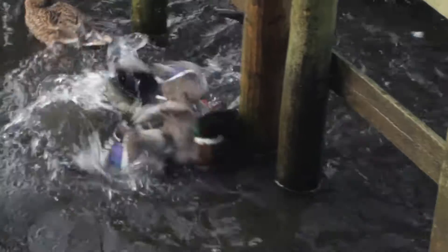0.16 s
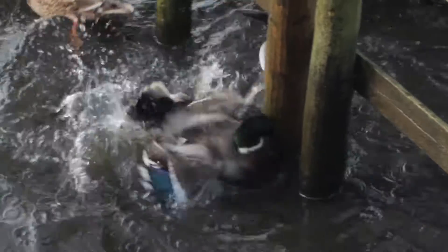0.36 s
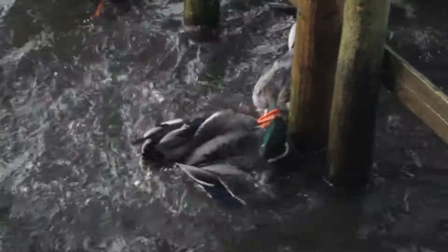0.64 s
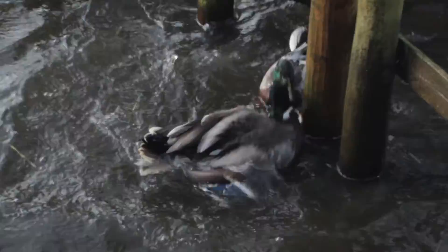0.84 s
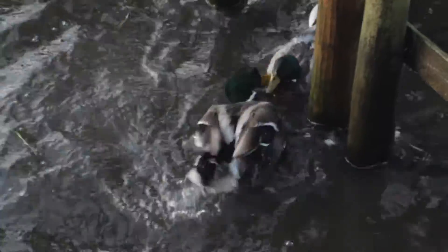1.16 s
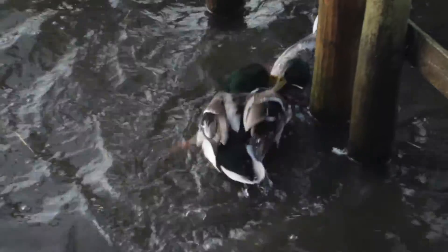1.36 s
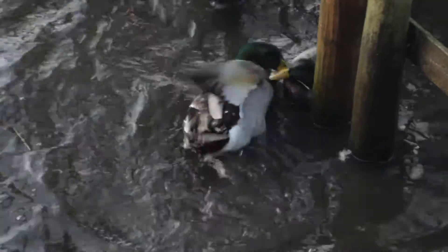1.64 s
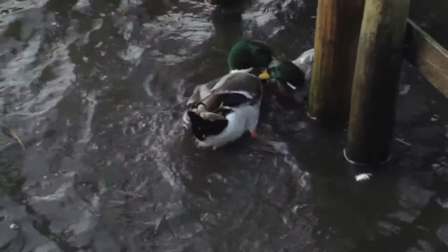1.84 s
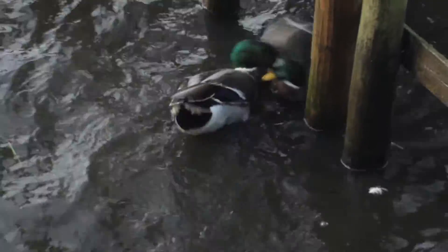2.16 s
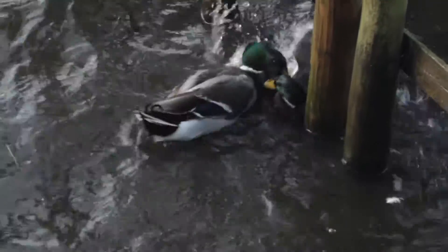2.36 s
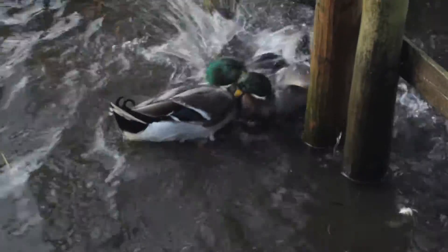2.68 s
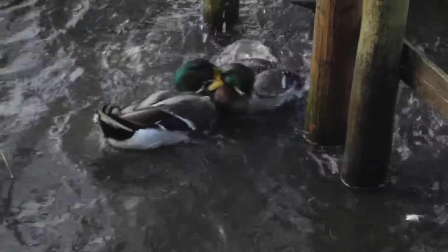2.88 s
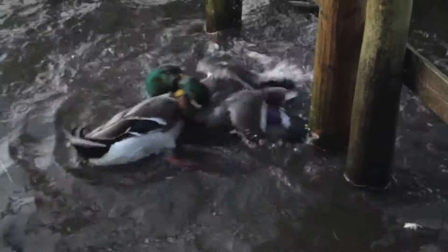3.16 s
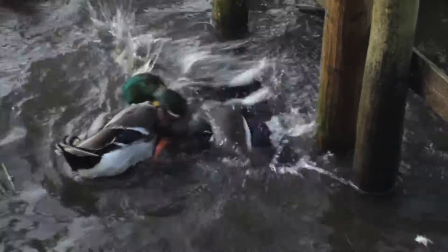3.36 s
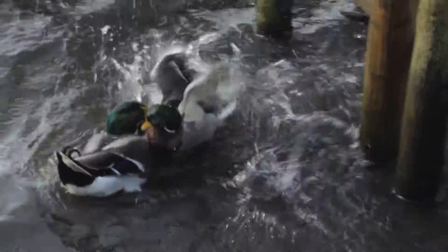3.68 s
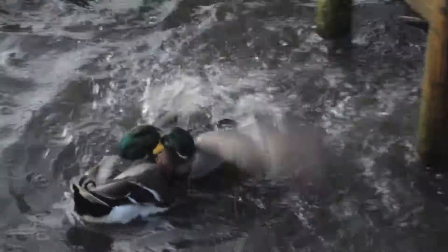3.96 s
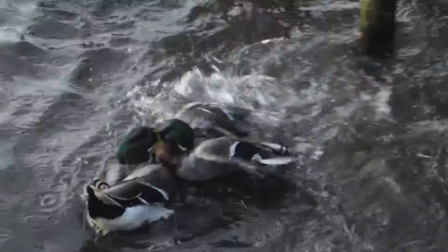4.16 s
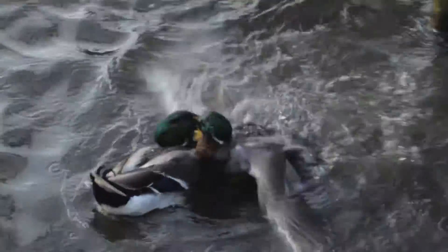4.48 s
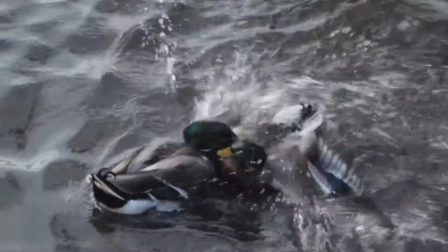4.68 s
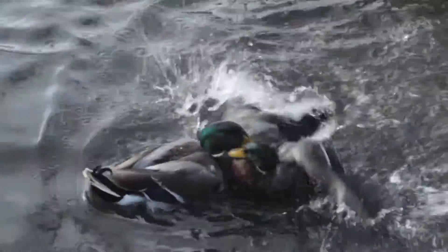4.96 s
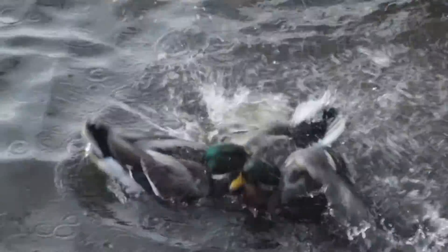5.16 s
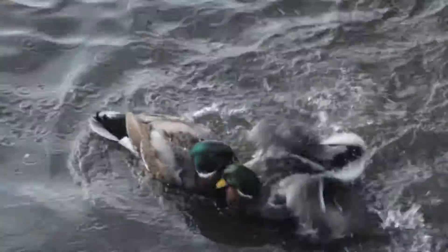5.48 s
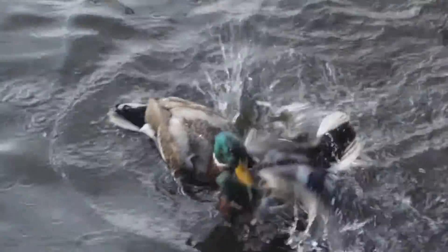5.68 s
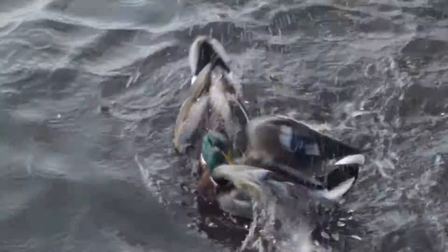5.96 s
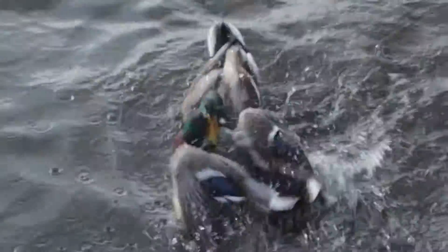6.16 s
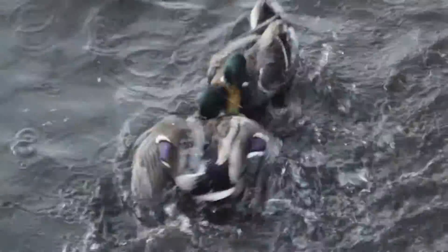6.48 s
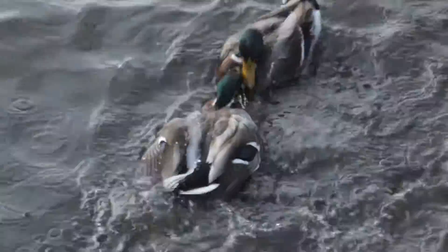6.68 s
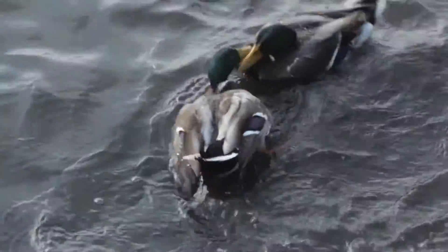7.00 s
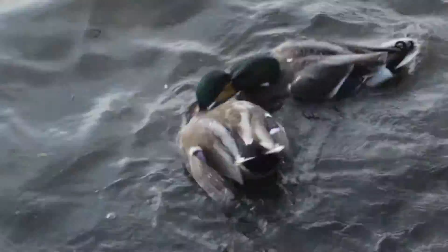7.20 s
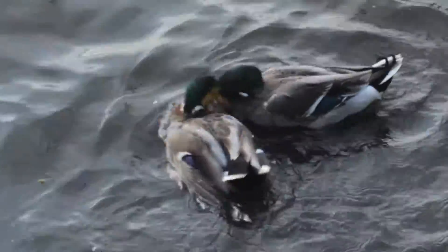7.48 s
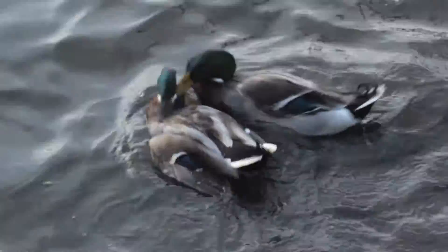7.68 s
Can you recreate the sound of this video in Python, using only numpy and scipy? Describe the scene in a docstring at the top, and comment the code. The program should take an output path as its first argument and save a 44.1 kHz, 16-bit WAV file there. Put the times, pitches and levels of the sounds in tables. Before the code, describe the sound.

Outdoors by a wooden pier, two ducks fight in water. A half-second flurry of wet wing slaps opens, then the water calms to small plops and trickles. After two seconds slaps return in bursts, hardest around five to six seconds, with bright spray and churning. A vehicle passes behind, its rumble, rush and tyre hum peaking after six and a half seconds, then everything fades. Small stereo recorder, close to the splashes, faint hiss.

```python
"""Two ducks fight in shallow water beside a wooden pier. A first short flurry of wing slaps, each a pop with
spray, gives way to churning water and plops, made of random drops and short gliding tones.
After two seconds the slaps return in bursts; a passing vehicle then swells up as rumble, rush and tyre hum,
all filtered noise, peaks after six seconds and sinks again as the churning fades out.
Low thumps, channel hiss and a faint high whistle go with it, on a small stereo recorder."""
import sys
import numpy as np
from scipy import signal
from scipy.fft import next_fast_len
from scipy.io import wavfile

SR = 44100
rng = np.random.default_rng(int(sys.argv[2]) if len(sys.argv) > 2 else 0)


def transcribe(signal):
    """Save signal, clipped to [-1, 1], as a 16-bit WAV file at the path in sys.argv[1]."""
    frames = np.atleast_2d(signal).T
    limited = np.clip(frames, -1, 1)
    pcm = np.round(limited * 32767).astype(np.int16)
    wavfile.write(sys.argv[1], SR, pcm)


N = 345514   # length in samples

# All levels are mixing levels: the filters, flicker and channel gains further on still change them.
# Wing slaps: start_s, smack_level_db, body_pitch_hz, spray_level_db, mist_db (at 8 kHz and up, re spray)
WING_SLAPS = [(0.118, -47, 3980, -47, 1), (0.1858, -35, 2670, -44.5, -2), (0.254, -42, 1550, -63, -15),
              (0.414, -60, 450, -45, -7), (0.455, -54, 493, -44.5, -18), (2.3195, -39, 2670, -38, -0.5),
              (2.531, -47, 1840, -49.5, -10), (2.5396, -36.5, 1740, -44, -6),
              (2.738, -46, 1510, -53.5, -19), (2.7459, -29.5, 2120, -42.5, 1.5),
              (3.1953, -43, 1860, -48, -5), (3.227, -60, 4000, -66, 12), (3.397, -44, 2650, -45.5, -7),
              (3.426, -40, 2670, -44.5, -2), (3.515, -67.5, 1100, -52, -6), (3.641, -60, 2490, -46, -11),
              (3.656, -40.3, 1110, -44.5, 2), (3.8682, -38.5, 2150, -41.5, 0),
              (4.112, -55, 2090, -53.5, -8), (4.602, -36, 2710, -37.5, -5),
              (4.797, -41, 1440, -40.5, -12.5), (4.978, -60, 4000, -47.5, -1),
              (4.9926, -24.5, 1363, -35.5, -19), (5.006, -26, 1540, -56, 7), (5.023, -48, 1500, -71, -27),
              (5.194, -39, 1500, -45.5, -4), (5.201, -35, 2350, -39.5, -6), (5.213, -37.5, 1940, -83, -8),
              (5.3642, -51, 1490, -45.5, -20), (5.458, -70, 2000, -52.5, -4), (5.702, -31, 2520, -34, -5),
              (5.722, -21.5, 4420, -42.5, -6), (5.9175, -41, 1430, -37.5, -8),
              (6.132, -60, 5970, -47.5, -2.5), (6.15, -40, 2630, -35.5, -6.5),
              (6.364, -63, 2000, -42, -5.5), (6.404, -58, 1500, -44, -4.5), (6.89, -55, 1500, -55, -13)]
# Tone colour of the spray: frequency_hz, density_db (per Hz)
SPRAY_COLOUR = [(70, 10.5), (250, 1), (700, 1.5), (2000, -5), (4200, -2.5), (5250, -2.5), (6600, -10.5),
                (12500, -11), (13800, -26)]
# Air pockets closing under water: start_s, level_db, first_pitch_hz, last_pitch_hz, length_s
AIR_PLOPS = [(0.091, -59, 1080, 1260, 0.0092), (0.242, -55, 384, 385, 0.028),
             (0.569, -66, 1160, 1230, 0.023), (0.655, -64, 660, 790, 0.026),
             (0.713, -65, 1580, 1450, 0.024), (1.168, -65, 2370, 2420, 0.0095),
             (1.358, -68, 1360, 1430, 0.016), (2.674, -54.5, 2070, 2300, 0.0072),
             (3.021, -63.5, 743, 866, 0.036), (3.363, -60, 1020, 1420, 0.011),
             (3.52, -49.5, 630, 1580, 0.027), (4.176, -65, 1950, 2030, 0.012),
             (4.321, -64.5, 1500, 1520, 0.018), (5.357, -53, 410, 520, 0.029),
             (5.597, -57, 540, 480, 0.034), (5.771, -55, 1450, 1550, 0.024),
             (6.568, -51, 1610, 1500, 0.011)]
# How strongly the water is stirred: time_s, level_db
CHURN_CURVE = [(0.0, -64), (0.37, -66), (0.8, -76.5), (2.3, -80.5), (2.42, -73.5), (2.7, -67),
               (2.85, -72.5), (3.27, -73), (3.58, -67.5), (3.92, -63.5), (3.99, -69.5), (4.05, -64),
               (4.16, -70.5), (4.34, -68), (4.45, -80.5), (4.6, -73), (4.82, -65.5), (5.06, -65),
               (5.69, -70), (5.89, -64), (7.04, -64), (7.24, -67), (7.44, -76.5), (7.83, -100)]
# Tone colour of the stirred water: frequency_hz, relative_density_db (per Hz)
WATER_COLOUR = [(150, 1), (400, 3), (800, 9), (2000, 5), (4200, 3), (5250, -6.5), (6600, -17), (13500, -19)]
# Tone colour of the low rumble: frequency_hz, relative_density_db (per Hz)
RUMBLE_COLOUR = [(40, -5), (90, 10.5), (150, 4), (250, -6), (400, -30.5)]
# Tone colour of the broad rush: frequency_hz, relative_density_db (per Hz)
RUSH_COLOUR = [(150, 1), (300, 1.5), (560, -4), (750, -14), (1050, -18.5), (1300, -25.5), (5250, -37.5),
               (6600, -81), (12000, -73)]
# Single low thumps: start_s, level_db
LOW_THUMPS = [(0.168, -37.5), (0.412, -33), (0.454, -40), (2.318, -34), (4.848, -36.5), (5.008, -34.5),
              (5.486, -40), (5.535, -29.5), (5.818, -27.5), (5.865, -32.5), (6.102, -27.5), (6.888, -27),
              (7.349, -31.5), (7.638, -34.5)]
# A vehicle passes: time_s, rumble_level_db, rush_level_db, tyre_hum_level_db
# Before the first row the levels stay as in that row.
PASSING_CURVE = [(4.2, -70, -90, -90), (4.55, -62, -69.5, -76), (5.17, -53.5, -65.5, -71.5),
                 (5.7, -48.5, -60, -63), (5.95, -44.5, -55, -58.5), (6.24, -41.5, -51.5, -55),
                 (6.6, -41, -42, -46.5), (6.85, -42, -43, -55), (7.06, -45.5, -47.5, -56),
                 (7.22, -47.5, -50, -66), (7.5, -55.5, -60, -75), (7.83, -63, -60.5, -72)]
# Short swells of the deep noise: centre_s, level_db
DEEP_SWELLS = [(0.5, -57), (2.69, -48.5), (3.5, -64)]
# Tone colour of the channel hiss: frequency_hz, relative_density_db (per Hz)
HISS_COLOUR = [(200, 4), (600, 2), (1500, -3.5), (4000, -6.5), (6500, -8.5), (15700, -11)]

SPRAY_T60_S = 0.24   # time for spray at 3 kHz to fall 60 dB
SPRAY_LEAD_S = 0.0021   # spray bursts this long before the slap's time
BODY_DB, BODY_OCTAVES = 4.5, 1   # swell of the spray around the body pitch: height, half width
SWISH_DB, SWISH_T60_S = -21, 0.06   # wing tip before the burst: level re spray, time to rise 60 dB
SMACK_TOP_HZ, SMACK_CYCLES = 6000, 5.7   # treble limit; cycles to fall 60 dB
FROTH_DB, FROTH_S = -11, 0.08   # bubbles after a slap: first level re spray, time span
GURGLE_DB, GURGLE_S = -18, 0.05   # bubbles after a plop: change of level over the time span
GURGLE_OCTAVES = 0.25   # pitch spread of those bubbles, up or down
WIDE_TREBLE_HZ = 2430   # the treble that differs between the channels lies mostly above this
SHARED_TREBLE_HZ, SHARED_TREBLE_DB = 6820, 7.5   # treble alike in both channels: lowest frequency, gain
DEEP_DB, DEEP_FOLLOWS = -65.5, 0.18   # deep noise at first; share of the rumble's rise in dB
SWELL_S = 0.063   # time from the middle of a deep swell to 1/e of its height
LUMPS_DB, LUMPS_HZ = 1.2, 22   # lumps in the passing vehicle's level: depth, speed
TYRE_HZ, TYRE_WIDTH_HZ = 955, 266   # tyre hum: centre and width of its band
TURN_HZ, RIGHT_SHARE = 133, 0.47   # where polarity turns over; right level as a share of the left
HISS_DB, TOP_HISS_DB = -69.5, -72.5
WHISTLE_HZ, WHISTLE_DB = 15734, -87.5
CUTOFF_HZ = 16000


def slap_spray():
    """The wing tip swishes in, water bursts up, then the spray dies away, treble first."""
    before_s = 0.03
    t = np.arange(-before_s, 0.4, 1 / SR)
    swish = from_db(SWISH_DB + 60 * t / SWISH_T60_S)
    out = np.zeros(N)
    for hz, drops in bands(droplets(26000, spread_db=0.5), 70, 14000):
        level = np.zeros(N)
        splash = from_db(-60 * t / (0.00037 + 10 / hz))
        spray_t60_s = SPRAY_T60_S * (hz / 3000) ** -0.2
        spray = from_db(-3.5 - 60 * t / spray_t60_s)
        burst = np.where(t < 0, swish, splash + spray)
        for s, _, body_hz, spray_db, mist_db in WING_SLAPS:
            body_db = BODY_DB * np.exp(-(np.log2(hz / body_hz) / BODY_OCTAVES) ** 2)
            mist = at_hz([(3000, 0), (8000, mist_db)], hz)
            add(level, s - SPRAY_LEAD_S - before_s, from_db(spray_db + body_db + mist) * burst)
        flicker_db = 0.92 * drift(44.0)
        out += level * drops * from_db(at_hz(SPRAY_COLOUR, hz) + flicker_db)
    return out * from_db(-2.0)


def slap_smacks():
    """Air caught under the wing is squeezed out: a pop that rings for a cycle or two."""
    out, t = np.zeros(N), np.arange(SR // 100) / SR
    signs = rng.choice([-1, 1], len(WING_SLAPS))
    for (s, level_db, hz, *_), sign in zip(WING_SLAPS, signs):
        fade = from_db(level_db - 60 * t * hz / SMACK_CYCLES)
        pop = sign * fade * np.sin(2 * np.pi * hz * t)
        add(out, s - 0.25 / hz, pop)   # the first crest falls on the slap's time
    return signal.sosfilt(signal.butter(4, SMACK_TOP_HZ, "low", fs=SR, output="sos"), out)


def slap_froth():
    """Each slap drags a dozen bubbles under, at pitches around and below its body, later ones fainter."""
    out = np.zeros(N)
    for (s, _, body_hz, spray_db, _), chance in zip(WING_SLAPS, rng.random((len(WING_SLAPS), 12, 2))):
        for late, pitch in chance:
            hz = min(body_hz, 2000) * 2 ** (0.5 - 2 * pitch)
            level = from_db(spray_db + FROTH_DB * (1 + late))
            add(out, s + FROTH_S * late ** 2, level * plop(hz, hz * 1.15, 8 / hz))
    return out


def stirred_water(churn_db):
    """Many drops make a wash, small random bubbles ring in it, and larger air pockets plop."""
    wash = coloured(droplets(5000, spread_db=0.0), WATER_COLOUR, together_db=1.5, patchy_db=2.5, rate_hz=18.5)
    small = small_bubbles()
    return from_db(churn_db) * (wash + from_db(-10.0) * small) + air_plops()


def small_bubbles():
    """Short rising tones at random times, pitches and levels; rms 1."""
    out = np.zeros(N)
    for when, pitch, size in rng.random((900, 3)):
        hz = 450 * 6 ** pitch
        add(out, when * N / SR, from_db(22 * size) * plop(hz, hz * 1.09, 12 / hz))
    return rms_one(out)


def air_plops():
    """Each closing air pocket is a gliding tone, joined by six bubbles that weaken the later they come."""
    out = np.zeros(N)
    for (s, level_db, *glide), chance in zip(AIR_PLOPS, rng.random((len(AIR_PLOPS), 6, 2))):
        _, last_hz, length_s = glide
        add(out, s, from_db(level_db) * plop(*glide))
        for late, pitch in chance:
            hz = last_hz * 2 ** (GURGLE_OCTAVES * (2 * pitch - 1))
            level = from_db(level_db + GURGLE_DB * (-0.5 + late))
            add(out, s + length_s / 2 + GURGLE_S * late, level * plop(hz, hz * 0.99, 10 / hz))
    return out * from_db(3 * drift(300))   # the pockets wobble as they close


def plop(first_hz, last_hz, length_s):
    """A bubble swells and dies as a sine that glides while its depth changes."""
    share = np.linspace(0, 1, int(length_s * SR) + 2)
    turns = length_s * share * (first_hz + (last_hz - first_hz) * share / 2)
    return np.sin(2 * np.pi * turns) * np.sin(np.pi * share ** 0.88) ** 2


def droplets(per_s, spread_db):
    """Two rows of random drop impacts, uneven in size if spread_db is above 0; rms 1."""
    size_db = spread_db * np.minimum(rng.exponential(1, (2, N)), 5)
    sizes = from_db(size_db) * rng.choice([-1, 1], (2, N))
    hits = rng.random((2, N)) < per_s / SR
    return rms_one(sizes * hits + 1e-9)


def wide_treble(x):
    """A treble copy, half a millisecond late, its phase wandering differently in each channel."""
    late = np.pad(x, (SR // 2000, 0))[:N]
    treble = signal.sosfilt(signal.butter(1, WIDE_TREBLE_HZ, "high", fs=SR, output="sos"), late)
    return scattered(treble, 2) * from_db([[-1.0], [1.5]])


def shared_treble(x):
    """A high band of the splashing with wandering phase, the same in both channels."""
    edges_hz = [SHARED_TREBLE_HZ, 1.68 * SHARED_TREBLE_HZ]
    band = signal.butter(2, edges_hz, "band", fs=SR, output="sos")
    return scattered(signal.sosfilt(band, x), 1)


def passing_vehicle(rumble_db, rush_db, lumps):
    """A vehicle goes by: deep noise, lumpy rumble and rush, with single low thumps."""
    deep = from_db(deep_level(rumble_db)) * band_pass(rng.standard_normal(N), 21.6, 56)
    rumble = coloured(rng.standard_normal((2, N)), RUMBLE_COLOUR, together_db=3.5, patchy_db=0.85, rate_hz=35)
    rush = coloured(rng.standard_normal((2, N)), RUSH_COLOUR, together_db=1.5, patchy_db=0.86, rate_hz=26)
    passing = lumps * (from_db(rumble_db) * rumble + from_db(rush_db) * rush)
    return deep + passing + low_thumps()


def deep_level(rumble_db):
    """The deep noise follows part of the rumble's rise and has a few short swells; in dB."""
    t = np.arange(N) / SR
    steady = from_db(DEEP_DB + DEEP_FOLLOWS * (rumble_db - rumble_db[0]))
    swells = sum(from_db(level_db) * np.exp(-((t - s) / SWELL_S) ** 2) for s, level_db in DEEP_SWELLS)
    return 20 * np.log10(steady + swells)


def low_thumps():
    """Each thump is a low tone that starts fast and fades within hundredths of a second."""
    out, t = np.zeros(N), np.arange(SR // 10) / SR
    rise = np.minimum(t / 0.0022, 1)
    for s, level_db in LOW_THUMPS:
        fade = from_db(level_db - 60 * t / 0.03)
        add(out, s, fade * np.sin(2 * np.pi * 150 * t) * rise)
    return out


def tyre_hum(hum_db, lumps):
    """Tyres on the road: a narrow band of noise near 1 kHz, weaker on the right."""
    low_hz, high_hz = TYRE_HZ - TYRE_WIDTH_HZ / 2, TYRE_HZ + TYRE_WIDTH_HZ / 2
    hum = band_pass(rng.standard_normal(N), low_hz, high_hz)
    return lumps * from_db(hum_db) * hum * [[1], [RIGHT_SHARE]]


def electronics():
    """Circuit noise: hiss of each channel, a shared band of hiss at the very top and a steady whistle."""
    hiss = [coloured(rng.standard_normal((2, N)), HISS_COLOUR, together_db=0, patchy_db=0.3, rate_hz=10)
            for side in range(2)]
    top = signal.sosfilt(signal.butter(6, 15000, "high", fs=SR, output="sos"), rng.standard_normal(N))
    whistle = np.sin(2 * np.pi * WHISTLE_HZ * np.arange(N) / SR)
    return from_db(HISS_DB) * np.array(hiss) + from_db(TOP_HISS_DB) * top + from_db(WHISTLE_DB) * whistle


def two_channels(x, apart):
    """The right is weaker and turns over in polarity above the bass; both gain treble; "apart" is added."""
    w = 2 * np.pi * TURN_HZ
    shared = [1 - RIGHT_SHARE, (1 + RIGHT_SHARE) * w]
    left = signal.lfilter(*signal.bilinear([2, 2 * w], shared, SR), x)
    right = signal.lfilter(*signal.bilinear([-2 * RIGHT_SHARE, 2 * RIGHT_SHARE * w], shared, SR), x)
    return np.array([left, right]) + apart


def coloured(source, spectrum, together_db, patchy_db, rate_hz):
    """Noise with a spectrum; the bands flicker partly together, partly alone; rms 1."""
    shared_db = together_db * drift(rate_hz)
    out = np.zeros(N)
    for hz, x in bands(source, spectrum[0][0], spectrum[-1][0]):
        out += x * from_db(at_hz(spectrum, hz) + shared_db + patchy_db * drift(rate_hz))
    return rms_one(out)


def bands(source, low_hz, high_hz):
    """Third-octave bands (centre, signal), neighbours fed from different rows of the source."""
    edges = 23 * 2 ** (np.arange(31) / 3)
    edges = edges[(edges > low_hz / 1.2) & (edges < high_hz * 1.2)]
    for k, (low, high) in enumerate(zip(edges, edges[1:])):
        sos = signal.butter(2, [low, high], "band", fs=SR, output="sos")
        yield np.sqrt(low * high), signal.sosfilt(sos, source[k % len(source)])


def scattered(x, count):
    """Copies of a sound whose phase wanders, each in its own way."""
    whole = signal.hilbert(x, next_fast_len(N))[:N]
    return np.array([np.real(whole * np.exp(3j * drift(40))) for k in range(count)])


def drift(rate_hz):
    """Slow random wandering with spread 1: smoothed noise, worked out at every 40th sample."""
    r = np.exp(-80 * np.pi * rate_hz / SR)
    noise = rng.standard_normal(N // 40 + 2002)
    slow = signal.lfilter([1], [1, -2 * r, r * r], noise)[2000:]   # skip the filter's start
    return np.interp(np.arange(N) / 40, np.arange(len(slow)), rms_one(slow))


def band_pass(x, low_hz, high_hz):
    """One steep band, rms 1."""
    return rms_one(signal.sosfilt(signal.butter(3, [low_hz, high_hz], "band", fs=SR, output="sos"), x))


def in_time(rows):
    """Columns of a curve table, one value a sample."""
    s, *columns = np.transpose(rows)
    return [np.interp(np.arange(N) / SR, s, c) for c in columns]


def at_hz(points, hz):
    """Read a spectrum on a log-frequency axis."""
    points = np.array(points)
    return np.interp(np.log(hz), np.log(points[:, 0]), points[:, 1])


def from_db(db):
    """Decibels to gain."""
    return 10 ** (np.asarray(db) / 20)


def rms_one(x):
    """Scale to unit rms."""
    return x / np.sqrt(np.mean(x ** 2) + 1e-20)


def add(out, s, sound):
    """Mix a sound in at a time in seconds."""
    i = int(s * SR)
    out[i:i + len(sound)] += sound[:max(N - i, 0)]


def scene():
    """Ducks, water and a passing vehicle through the two channels."""
    smacks = slap_smacks()
    soft_splash = slap_spray() + slap_froth() + stirred_water(*in_time(CHURN_CURVE))
    ducks = soft_splash + smacks
    rumble_db, rush_db, hum_db = in_time(PASSING_CURVE)
    lumps = from_db(LUMPS_DB * drift(LUMPS_HZ))
    apart = from_db(2.0) * wide_treble(ducks) + tyre_hum(hum_db, lumps)
    apart = apart + from_db(SHARED_TREBLE_DB) * shared_treble(soft_splash)
    return two_channels(ducks + passing_vehicle(rumble_db, rush_db, lumps), apart) + electronics()


def record(dry):
    """The recorder cuts the top: everything above the cutoff is at least 50 dB down."""
    return signal.sosfilt(signal.cheby2(20, 50, CUTOFF_HZ, fs=SR, output="sos"), dry)


dry = scene()
out = record(dry)
transcribe(out)
```